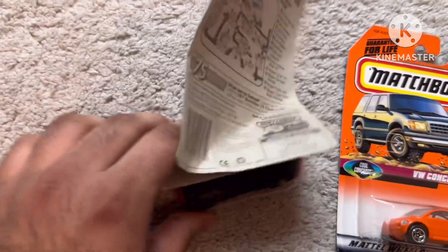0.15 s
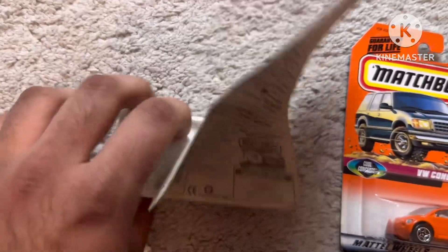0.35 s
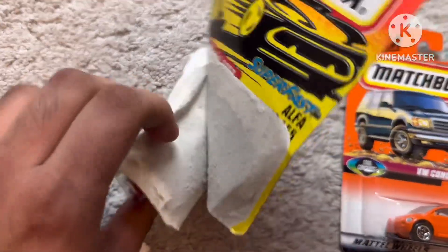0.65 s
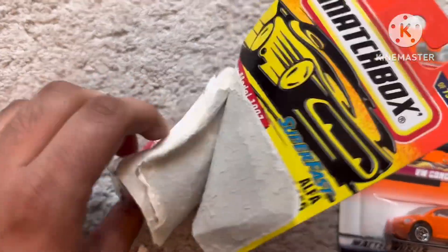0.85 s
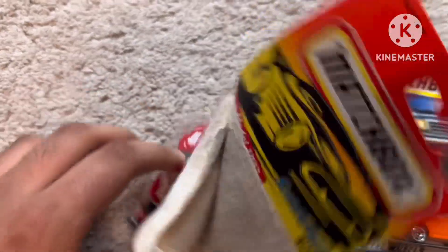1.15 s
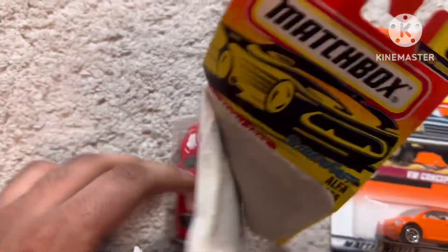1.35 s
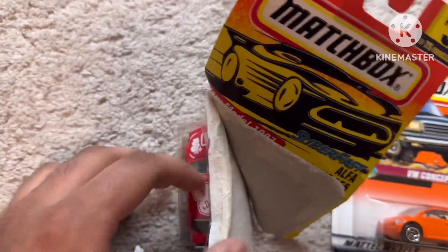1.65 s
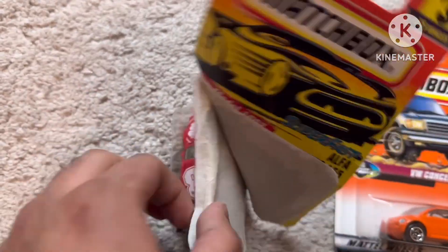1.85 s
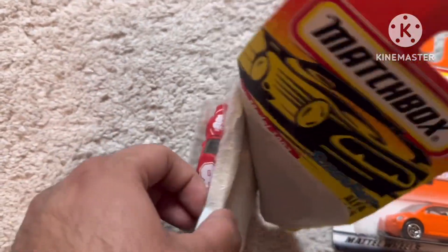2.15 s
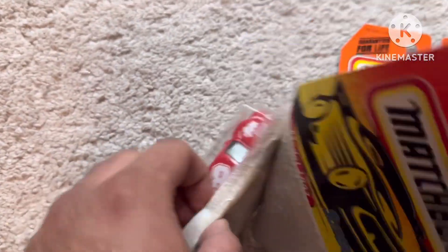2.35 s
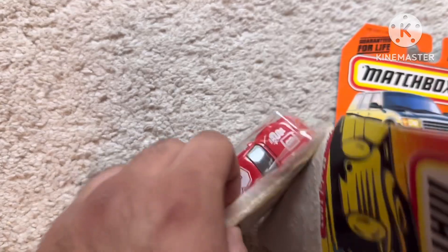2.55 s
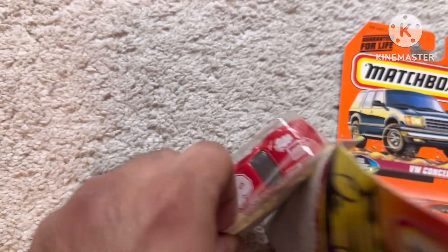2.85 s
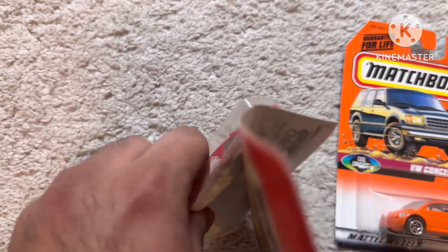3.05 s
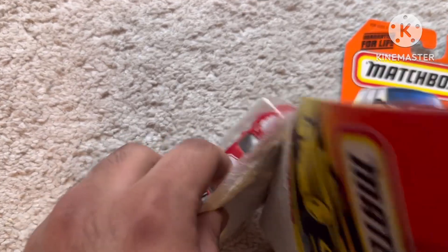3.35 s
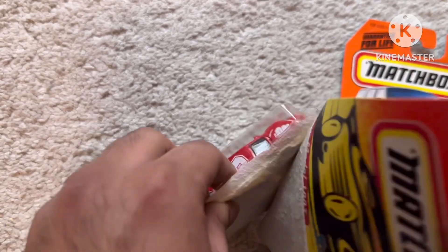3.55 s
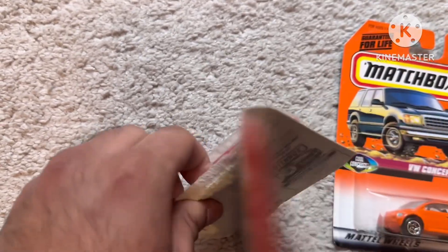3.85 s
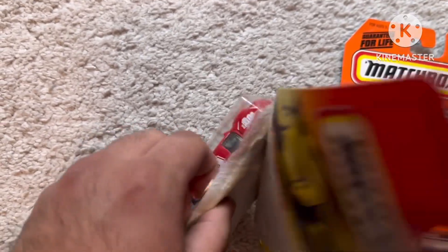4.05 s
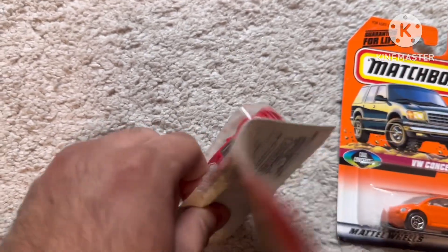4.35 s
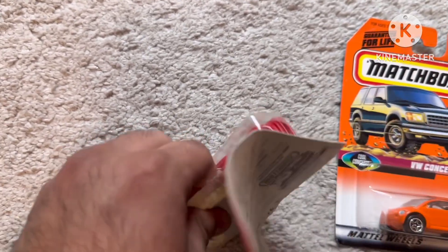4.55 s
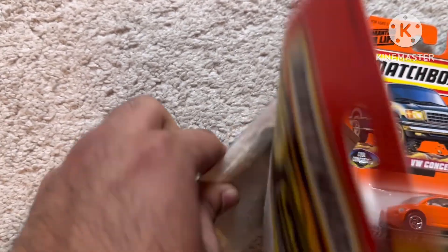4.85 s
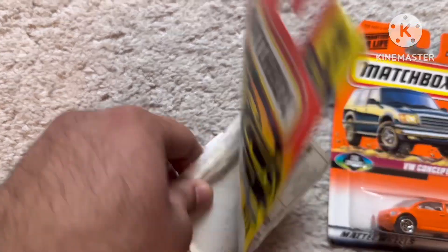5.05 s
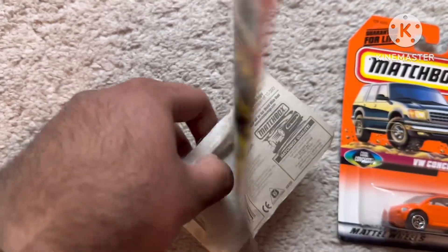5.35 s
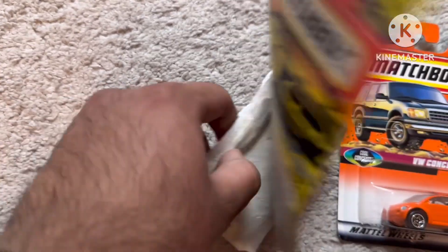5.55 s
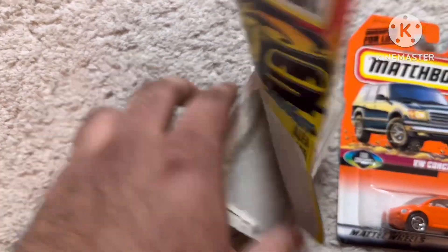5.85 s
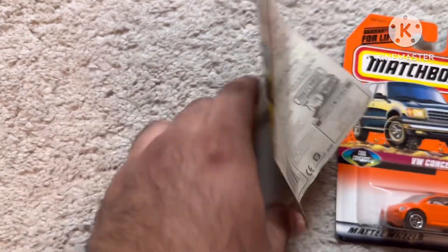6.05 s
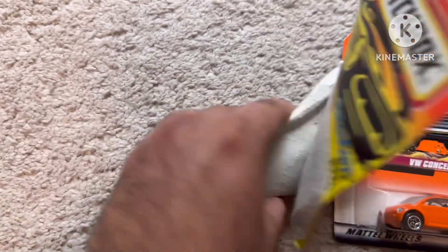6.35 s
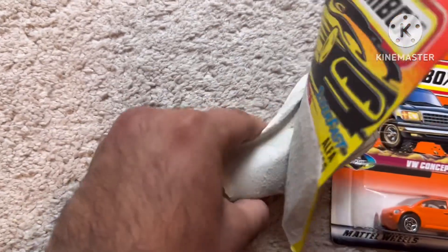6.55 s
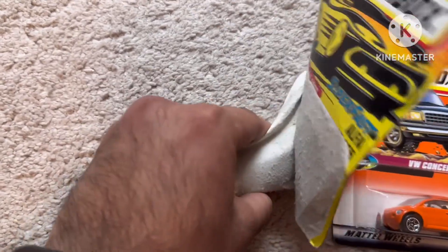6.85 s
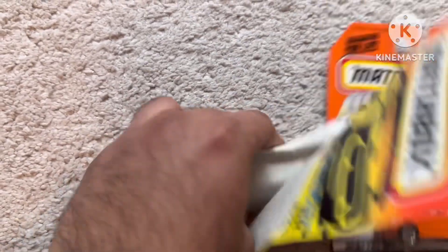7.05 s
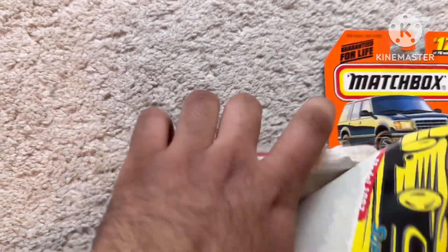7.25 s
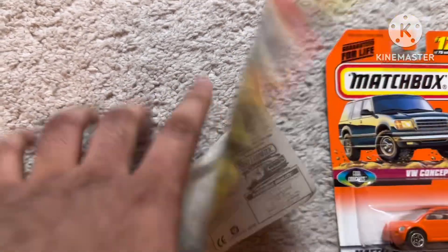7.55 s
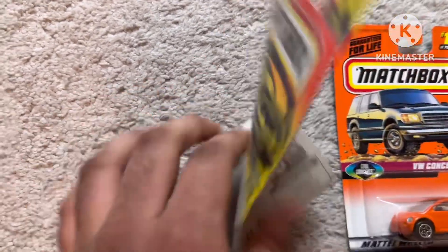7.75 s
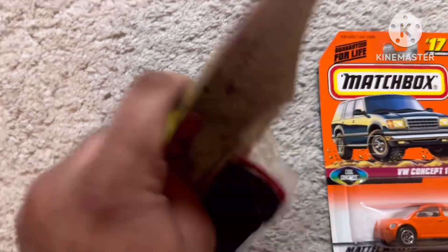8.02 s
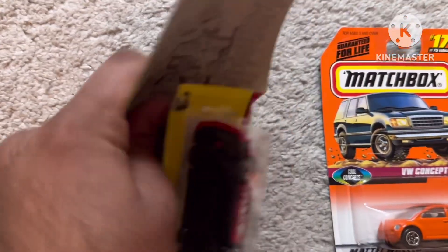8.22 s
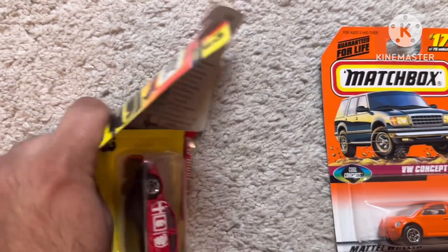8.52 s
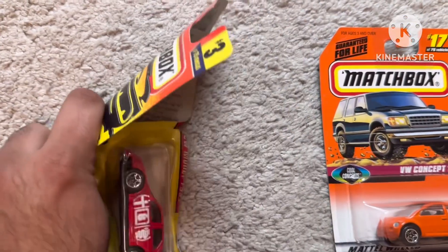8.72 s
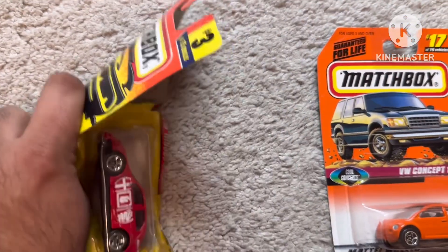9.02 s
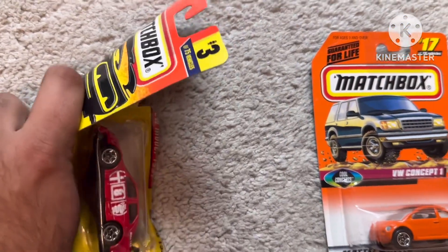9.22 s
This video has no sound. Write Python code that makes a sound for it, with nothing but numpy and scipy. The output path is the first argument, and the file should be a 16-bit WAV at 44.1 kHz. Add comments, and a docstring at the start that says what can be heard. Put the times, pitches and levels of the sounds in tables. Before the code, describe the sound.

Irregular close crackles of thin plastic and card, dry fibre ticks and rubbing hands, a bump on the microphone stand early on, quiet indoors.

```python
"""The plastic shell of a toy car's blister pack buckles in sharp snaps as hands peel off its card on a carpet.
Snaps, scuffs, breaking fibres and crinkles are blows that ring short, heavily damped modes of the pack.
Short strokes of the fingers are filtered grains and noise; a creak is a run of slips that rings the shell.
Once the card knocks the microphone's stand: a falling thump, then a low sway. A small furnished room answers
with fading noise, over quiet room air."""
import sys
import numpy as np
from scipy import signal
from scipy.fft import rfft, irfft, next_fast_len
from scipy.io import wavfile
from scipy.ndimage import map_coordinates

SR = 44100
rng = np.random.default_rng(int(sys.argv[2]) if len(sys.argv) > 2 else 0)


def persist_wave(psi):
    """Save psi, clipped to +-1, as 16-bit WAV."""
    counts = np.round(np.clip(psi, -1, 1) * 32767).astype(np.int16)
    wavfile.write(sys.argv[1], SR, np.atleast_2d(counts).T)


N = 413653
TIME = np.arange(N) / SR

# The plastic shell buckles. Each row: start in seconds, then thud, knock, crack and tick levels in dB.
SNAPS = [(0.0087, -36.5, -29.5, -35, -38), (0.044, -61.5, -40.5, -52, -60.5), (0.74, -43, -18, -20, -21.5),
         (1.2572, -30.5, -32.5, -26.5, -21), (1.431, -46.5, -45, -54, -48),
         (1.7901, -50.5, -31.5, -33.5, -40.5), (1.8217, -41.5, -39, -63, -46),
         (2.2515, -57.5, -43, -44, -46.5), (2.831, -37, -26.5, -19, -25.5), (2.9695, -64, -35.5, -42, -38),
         (3.2838, -28, -20.5, -19, -20.5), (3.4605, -42.5, -29.5, -28.5, -28),
         (3.9146, -47.5, -35.5, -21.5, -19), (4.2108, -47.5, -33, -23.5, -21.5),
         (4.293, -49.5, -40, -40.5, -38.5), (4.8291, -51, -45.5, -35, -29),
         (4.9129, -56.5, -43, -54, -39.5), (5.0894, -48, -32, -26, -31.5),
         (5.3013, -65.5, -47.5, -49.5, -53), (6.4638, -55, -38, -39.5, -63),
         (6.4715, -43.5, -26.5, -18, -29), (6.6159, -53.5, -47, -49, -45.5),
         (6.7093, -38.5, -36, -40, -37.5), (6.723, -39, -26, -27, -28), (6.8178, -48.5, -55, -45, -37),
         (6.825, -44.5, -37, -40, -48.5), (6.917, -47, -35, -40.5, -46.5), (6.9976, -51, -27.5, -37, -72),
         (7.0793, -31.5, -23, -24, -31), (7.1236, -42.5, -34, -35, -47), (7.2809, -49, -33.5, -55, -63),
         (7.315, -49, -39, -47.5, -76), (7.441, -52, -38, -53, -63), (7.479, -43.5, -38.5, -53, -73),
         (7.89, -42, -35.5, -53, -73), (7.9027, -54, -39, -58, -62), (7.923, -38.5, -32, -35, -42.5),
         (8.0156, -42, -36, -40, -52), (8.3441, -27.5, -23, -18, -28.5), (8.4677, -40, -31, -31.5, -33),
         (8.6017, -63, -37.5, -48, -40.5), (9.0043, -38, -27, -45, -61), (9.0276, -65.5, -47, -46, -35.5)]
# The hand shifts its hold and drags the card over the plastic. Each row: start in seconds, length in seconds,
# then the levels of hand on carpet, card and plastic hiss in dB.
STROKES = [(0.0, 0.025, -39.5, -41, -55), (0.119, 0.12, -66.5, -54.5, -62),
           (0.275, 0.089, -52, -56.5, -65.5), (0.572, 0.38, -67, -53.5, -60.5),
           (0.83, .05, -63.5, -55.5, -67.5), (1.128, 0.073, -54.5, -51.5, -49),
           (1.259, .045, -39.5, -43, -41), (1.333, .12, -54, -56, -52.5), (1.807, 0.045, -61, -49, -53),
           (1.943, 0.036, -60.5, -50.5, -58.5), (2.161, .04, -67.5, -54.5, -59.5),
           (2.223, 0.02, -62.5, -48, -49.5), (2.341, 0.018, -57, -52.5, -57.5),
           (2.43, 0.037, -72, -58, -57.5), (2.602, 0.01, -64.5, -59, -52.5), (2.84, 0.018, -39, -40.5, -41),
           (2.972, 0.045, -47.5, -52.5, -71.5), (3.223, 0.16, -59.5, -63, -63),
           (3.357, .08, -63, -61.5, -64.5), (3.612, 0.056, -61.5, -61.5, -54), (3.918, .04, -58, -45, -42),
           (3.977, 0.15, -61, -56, -51.5), (4.374, .06, -68.5, -68, -50.5),
           (4.803, 0.054, -58.5, -53, -50.5), (4.88, 0.034, -56, -55, -57.5),
           (5.305, 0.018, -73, -49, -55.5), (5.374, 0.15, -90.5, -65, -64.5), (5.552, .13, -76.5, -54, -62),
           (5.824, 0.057, -57.5, -51, -67.5), (5.921, .05, -61.5, -56.5, -67),
           (6.333, 0.16, -67, -60.5, -67), (6.517, .08, -78.5, -50.5, -51), (6.629, 0.021, -95, -48.5, -62),
           (6.799, 0.0067, -63, -47.5, -48.5), (6.92, 0.2, -59, -60.5, -58.5),
           (7.204, 0.02, -45, -43.5, -53), (7.269, 0.044, -51.5, -51, -57), (7.462, .055, -63, -49.5, -56),
           (7.525, .04, -47.5, -57, -77.5), (7.612, 0.045, -58, -56, -63),
           (7.777, 0.062, -53.5, -48.5, -56), (7.886, 0.069, -56, -43.5, -48.5),
           (8.013, .06, -49.5, -44.5, -43.5), (8.329, 0.047, -46, -50.5, -47.5),
           (8.427, 0.086, -53.5, -51.5, -49.5), (8.547, .07, -51.5, -51, -45.5),
           (8.649, .1, -65.5, -53.5, -51.5), (8.844, 0.16, -60.5, -51, -53.5),
           (8.986, 0.074, -60, -50, -49.5), (9.094, 0.039, -63.5, -48, -48), (9.219, .03, -67.5, -74, -64)]


def from_db(db):
    """Turn decibels into a loudness factor."""
    return np.exp(np.asarray(db) * (np.log(10) / 20))


def rms_one(x):
    """Scale a signal to an average strength (rms) of 1."""
    return x / np.sqrt(np.mean(x ** 2) + 1e-20)


def at_hz(points, hz, column=1):
    """Read a table between its rows, with pitch on a log scale as we hear it."""
    points = np.array(points)
    return np.interp(np.log(np.maximum(hz, 1)), np.log(points[:, 0]), points[:, column])


def in_time(rows):
    """Read the columns of a curve at every sample."""
    seconds, *columns = np.transpose(rows)
    return [np.interp(TIME, seconds, column) for column in columns]


def during(rows):
    """True while a curve lasts."""
    return (TIME >= rows[0][0]) & (TIME <= rows[-1][0])


def drift(rate):
    """Wander slowly at random with spread 1, heading for a new value `rate` times a second."""
    knots = rng.standard_normal(4000)
    return rms_one(np.interp(TIME * rate, np.arange(len(knots)), knots))


def left_right(pan_db):
    """Give the factors that make the left side louder than the right by this many dB."""
    return from_db([[pan_db / 2], [-pan_db / 2]])


def add(out, start, sound):
    """Mix a stereo sound in at a start time in seconds."""
    at = max(round(start * SR), 0)
    out[:, at:at + sound.shape[1]] += sound[:, :N - at]


def coloured(mid, side, spectrum):
    """Filter two unrelated signals into one stereo sound whose sides are more alike at some pitches; rms 1."""
    # Each row: frequency in Hz, likeness of the two sides from 0 to 1.
    likeness = [(60, 0.91), (300, 0.75), (700, 0.75), (1400, 0.32), (3000, 0.4), (7000, 0.5), (15000, 0.6)]
    size = next_fast_len(N)
    hz = np.arange(size // 2 + 1) * SR / size
    alike = np.clip(at_hz(likeness, hz), 0, 1)
    mid = np.sqrt(1 + alike) * rfft(mid, size)
    side = np.sqrt(1 - alike) * rfft(side, size)
    sides = np.array([mid + side, mid - side])
    return rms_one(irfft(sides * from_db(at_hz(spectrum, hz)), size)[:, :N])


def snaps():
    """Each buckle of the shell is one sudden release: a single blow rings the pack."""
    out = np.zeros((2, N))
    for start, *levels_db in SNAPS:
        add(out, start, pack_ring(np.ones(1), levels_db))
    return out


def pack_ring(force, levels_db, count=22, size=2400):
    """A force rings the pack's heavily damped modes, which shift each time it bends into a new shape."""
    # The four registers: thud, knock, crack, tick. Each row: low Hz, high Hz, time to fall 60 dB in seconds,
    # build-up in seconds, slope in dB per octave, left over right in dB, phase spread between sides in radians.
    registers = [(179.4, 561, 0.032, 0.0041, 1, 4, 0.17), (611.3, 1447, 0.033, 0.00089, -2, 1, 1),
                 (1510, 3447, 0.012, 0.00032, -6.5, 2, 1), (3440, 17300, 0.0073, 0.0009, -10, 1.5, 0.68)]
    event_s = 0.01   # each level is the event's energy spread over this time
    t = np.arange(size) / SR
    out = 0
    for (low, high, t60, build, slope_db, pan_db, spread), level_db in zip(registers, levels_db):
        place = (np.arange(count) + rng.random(count)) / count
        hz = low * (high / low) ** place[:, None]
        strength, life, phase, skew = rng.standard_normal((4, count, 1))
        # each mode takes its own share of the blow, swells quickly and dies
        gain = (1 + 0.5 * strength) * from_db(slope_db * np.log2(hz / low)) * np.sqrt(hz / low)
        fall = from_db(-60 * t / (t60 * np.exp(0.1 * life)))
        envelope = gain * fall * (1 - np.exp(-t / build))
        swing = 2 * np.pi * hz * t + 1.84 * phase
        left = (envelope * np.sin(swing)).sum(axis=0)
        right = (envelope * np.sin(swing - 0.15 - spread * skew)).sum(axis=0)
        band_hz = [low * 0.84, min(high * 3.2, SR * 0.45)]
        band = signal.butter(2, band_hz, "band", fs=SR, output="sos")
        sides = signal.fftconvolve(np.array([left, right]), force[None], axes=1)
        sides = signal.sosfilt(band, sides) * left_right(pan_db)
        energy = np.mean(np.sum(sides ** 2, axis=1))
        out = out + from_db(level_db) * sides * np.sqrt(event_s * SR / energy)
    return out


def scuffs(slips_per_s=1500, uneven_db=3.5, fade_db=6.0):
    """The card scuffs or rips: a fading run of tiny uneven slips rings the pack."""
    # Each row: start in seconds, length in seconds, then thud, knock, crack and tick levels in dB.
    bursts = [(0.014, 0.011, -55.5, -36.5, -45, -41.5), (0.718, 0.046, -45, -38, -39, -34.5),
              (0.756, 0.042, -53, -34.5, -37, -46), (0.845, 0.016, -47, -43, -65, -52),
              (1.442, 0.017, -41, -44, -48.5, -45.5), (1.571, 0.027, -38, -31, -35.5, -31),
              (2.229, 0.025, -43.5, -51, -48, -46), (2.9716, 0.004, -26.5, -28, -34, -40.5),
              (2.979, 0.02, -67, -41, -51, -45), (4.087, 0.014, -38, -36, -38, -34),
              (4.273, 0.018, -49, -43, -39.5, -44), (4.696, 0.017, -51.5, -36, -35, -37.5),
              (4.843, 0.0076, -59, -41, -42, -46), (5.127, 0.012, -44.5, -29, -39.5, -36),
              (5.143, 0.018, -47, -60, -52, -47.5), (5.312, 0.0056, -52.5, -41, -45, -51.5),
              (5.815, 0.012, -63, -38.5, -39.5, -48), (5.83, 0.021, -57, -46, -45, -50),
              (7.052, 0.0094, -33, -29.5, -35.5, -43), (7.278, 0.025, -61, -38.5, -42.5, -53),
              (7.46, 0.017, -54, -45, -47, -55), (7.611, 0.034, -48, -56, -48, -60),
              (7.776, 0.03, -49, -42, -49, -57), (8.36, 0.019, -37, -32, -49, -47),
              (8.481, 0.009, -46, -57, -58, -60)]
    out = np.zeros((2, N))
    for start, length, *levels_db in bursts:
        chance = rng.random(SR // 10)
        size, sign = rng.standard_normal((2, SR // 10))
        progress = np.arange(SR // 10) / (length * SR)
        slips = (chance < slips_per_s / SR) * np.sign(sign)
        force = slips * from_db(uneven_db * size - fade_db * progress)
        force[0] = 2   # the first slip is firm
        add(out, start, pack_ring(force[progress < 1], levels_db))
    return out


def fibres():
    """A fibre of the card lets go with a small dry tick: one tap on the pack."""
    # Each row: start in seconds, level in dB, brightness in dB.
    breaks = [(0.2783, -45.5, -12), (0.2922, -51, -16), (0.3146, -48, -9), (0.3414, -52, -10),
              (0.362, -52, -5), (0.4835, -41.5, -3), (0.502, -50, 2.5), (0.518, -45, -17),
              (0.5538, -43.5, -4.5), (.566, -44, 3.5), (0.582, -54.5, 4), (0.606, -44, -10),
              (0.6167, -42, -0.5), (0.6376, -46, -1.5), (0.6497, -45.5, -4), (0.669, -48, 0.5),
              (.683, -50.5, 7), (.6973, -52.5, 1), (1.1278, -50.5, 1.5), (1.73, -48.5, -6), (2.197, -52, 0),
              (2.369, -61, -18), (2.55, -45.5, -3), (3.6024, -53, 7.5), (3.803, -59.5, 1), (4.537, -69, 15),
              (5.511, -40, -15.5), (5.6262, -49, -12), (5.6644, -42, -5.5), (6.1718, -39, -15.5),
              (6.235, -53.5, -2), (6.3, -48.5, -16.5), (6.32, -47, -19.5), (6.369, -44.5, -23.5),
              (8.311, -52.5, -10), (8.9428, -43.5, 2)]
    # For thud, knock, crack and tick: offset in dB, and the share of the brightness that each takes.
    offsets_db, bright_share = np.array((-11, -1, -4.5, -1)), np.array((0.48, 0.063, 0.12, 1))
    out = np.zeros((2, N))
    for start, level_db, bright_db in breaks:
        levels_db = level_db + offsets_db + bright_db * bright_share
        add(out, start, pack_ring(np.ones(1), levels_db, count=12, size=1300))
    return out


def crinkles(hand_db, card_db, hiss_db, uneven_db=0.5, above_rub_db=-5.5, count=2):
    """During each stroke a few stray creases give way as small blows, louder under a firmer stroke."""
    out = np.zeros((2, N))
    rub_db = np.array([hand_db - 5.5, card_db - 1.5, flexing(card_db, hiss_db), hiss_db - 9.0])
    for start, length, *_ in STROKES:
        for k, (when, size) in enumerate(rng.random((count, 2))):
            at = int(np.clip((start + length * (k + when) / count) * SR, 0, N - 1))
            levels_db = rub_db[:, at] + above_rub_db + 2 * uneven_db * size
            add(out, at / SR, pack_ring(np.ones(1), levels_db, count=7, size=1000))
    return out


def rubbing(hand_db, card_db, hiss_db):
    """The hand shifts on the carpet, fingers rub the card, the card flexes and slides on the plastic."""
    # Colours of the hand on the carpet, the rubbed card, its flexing and the plastic's hiss.
    # Each row: frequency in Hz, relative strength in dB per Hz.
    carpet_colour, card_colour = [(25, -7), (60, 8), (110, 9), (180, 2.5), (300, 5), (420, 1), (600, -32),
                                  (1200, -44)], [(250, -22), (450, -5.5), (560, -0.5), (820, 5),
                                                  (1030, -.5), (1280, 6), (1550, -7), (2100, -19.5),
                                                  (5000, -35.5)]
    flex_colour, hiss_colour = [(1200, -17), (1600, -3.5), (2000, 3), (2400, -4), (2900, -4.5), (3600, -15),
                                (6000, -24.5), (12000, -51.5)], [(1800, -10), (3000, 1.5), (4400, 7), (5500, 2.5), (7400, 1.5),
                                              (8500, 5.5), (10000, 0), (13000, -9), (16000, -7.5)]
    flex_db = flexing(card_db, hiss_db)
    hand = friction(hand_db, carpet_colour, grains_per_s=300, grain_db=-1.0, smooth=1.0,
                    flutter_db=-1.0, pan_db=-0.4)
    card = friction(card_db, card_colour, grains_per_s=300, grain_db=4.5, smooth=0.68,
                    flutter_db=0.5, pan_db=2.0)
    flex = friction(flex_db, flex_colour, grains_per_s=470, grain_db=2.5, smooth=0.94,
                    flutter_db=4.0, pan_db=0.5)
    hiss = friction(hiss_db, hiss_colour, grains_per_s=1100, grain_db=2.5, smooth=0.78,
                    flutter_db=2.6, pan_db=0.6)
    return hand + bending(card + flex, patchy_db=5.0, per_s=13.0) + bending(hiss, patchy_db=3.5, per_s=9.7)


def friction(level_db, spectrum, grains_per_s, grain_db, smooth, flutter_db, pan_db):
    """Fibres catch in tiny grains of uneven size, more of them under a firmer stroke, over a smooth rush."""
    rate = grains_per_s * from_db(0.5 * (level_db - level_db.mean()))
    sizes = from_db(grain_db * np.minimum(rng.exponential(1, (2, N)), 4))
    sizes = sizes * rng.choice([-1, 1], (2, N))
    catches = rng.random((2, N)) < rate / SR
    grains = rms_one(sizes * catches / np.sqrt(rate))
    force = grains + smooth * rng.standard_normal((2, N))
    loudness = from_db(level_db + flutter_db * drift(90))
    return coloured(*force, spectrum) * loudness * left_right(pan_db)


def flexing(card_db, hiss_db):
    """The card flexes with both the rubbing and the sliding: a weighted mean of their levels, moved by an offset."""
    follows_hiss, offset_db = 0.3, -3.5
    return card_db + follows_hiss * (hiss_db - card_db) + offset_db


def bending(x, patchy_db, per_s, count=40):
    """As the card bends, its resonances come and go: random patches of gain over pitch and time."""
    hz, t, cells = signal.stft(x, SR, nperseg=512)
    pitch = count * np.log(np.maximum(hz, 100) / 100) / np.log(hz[-1] / 100)
    patches = rng.standard_normal((count + 2, 400))
    where = np.meshgrid(pitch, t * per_s, indexing="ij")
    gain_db = patchy_db * map_coordinates(patches, where, order=1)
    # keep the average power gain at 1
    gain = from_db(gain_db) / np.sqrt(np.mean(from_db(2 * gain_db)))
    return signal.istft(cells * gain, SR)[1][:, :N]


def handling(step_size=40):
    """Add up the power of grip, strokes and slides after snaps: hand, card and hiss in dB at every sample."""
    # The holding hand's faint rubbing. Each row: time in seconds, level in dB.
    grip = [(0, -62.5), (1.5, -59.5), (2.4, -64), (3.4, -59), (5.2, -67), (6.0, -63), (7.0, -63),
            (8.6, -63), (9.38, -61)]
    # Relative to that, in dB: hand on carpet, card, plastic hiss.
    grip_offsets_db = np.array((-7.0, 0, -2.5))
    # The hand pauses and eases its grip. Each row: start in seconds, length in seconds.
    rests = [(0.979, .11), (1.648, 0.043), (2.02, 0.086), (2.65, 0.13), (3.103, .06), (3.731, 0.13),
             (4.477, 0.11), (4.966, 0.028), (5.741, 0.083), (7.355, 0.043), (7.701, 0.077), (8.143, 0.18),
             (9.277, 0.076)]
    # The freed card slides to rest after a snap: hand, card and hiss in dB relative to its thud, knock and tick.
    settle_offsets_db = (-10, -13.5, -19.5)
    rest_db = -6
    # times in seconds to rise or fall by 20 dB
    attack_s, release_s, settle_s = 0.022, 0.044, 0.046
    rest_fade_s = 0.046   # the rest's depth shrinks tenfold in this time at either end

    t = TIME[::step_size]
    resting = sum(from_db(swell_db(t, start, length, rest_fade_s, rest_fade_s)) for start, length in rests)
    grip_db = np.interp(t, *np.transpose(grip)) + rest_db * resting
    power = from_db(grip_db + grip_offsets_db[:, None]) ** 2
    for start, length, *levels_db in STROKES:
        swell = swell_db(t, start, length, attack_s, release_s)
        power = power + from_db(np.array(levels_db)[:, None] + swell) ** 2
    for start, thud_db, knock_db, _, tick_db in SNAPS:
        levels_db = np.add([thud_db, knock_db, tick_db], settle_offsets_db)
        swell = swell_db(t, start, 0, settle_s, settle_s)
        power = power + from_db(levels_db[:, None] + swell) ** 2 * (t > start)
    return np.array([np.interp(TIME, t, 10 * np.log10(p)) for p in power])


def swell_db(t, start, length, attack_s, release_s):
    """Rise, hold and fall along straight lines in dB; each time given is for 20 dB."""
    before = (start - t) / attack_s
    after = (t - start - length) / release_s
    return -20 * np.clip(np.maximum(before, after), 0, 10)


def creak(jitter=0.12, t60=0.012, size=1500):
    """The card sticks and slips on the plastic: slips ring the taut shell at a buzzing rate that slows at the end."""
    # Each row: time in seconds, slips per second, level in dB.
    slipping = [(6.49, 200, -52), (6.525, 300, -42), (6.545, 285, -31), (6.56, 210, -36),
                (6.583, 96, -40.5)]
    # Modes of the taut shell. Each row: frequency in Hz, relative level in dB.
    shell = [(1960, 14), (2520, 15), (2950, 8.5), (3600, -17), (4250, 11), (4650, 13), (5300, -30),
             (6780, 2), (8390, 4.5), (9100, 8)]
    rate, level_db = in_time(slipping)
    uneven_rate = rate * (1 + jitter * drift(200)) * during(slipping)
    turns = np.floor(np.cumsum(uneven_rate) / SR)
    # one slip at each whole turn
    slips = np.diff(turns, prepend=0) * from_db(level_db) * np.sqrt(SR / rate)
    t = np.arange(size) / SR
    modes = sum(from_db(db) * np.cos(2 * np.pi * hz * t + rng.uniform(-1.2, 1)) for hz, db in shell)
    ring = modes * from_db(-60 * t / t60)
    return signal.oaconvolve(slips, ring / np.linalg.norm(ring))[:N]


def stand():
    """A knock travels up the stand as a thump of falling pitch and leaves it swaying at one low pitch."""
    # The knock. Each row: time in seconds, frequency in Hz, level in dB.
    bump = [(1.258, 190, -60), (1.267, 110, -22), (1.275, 66, -7.5), (1.283, 56, -13.5), (1.294, 50, -29),
            (1.315, 47, -30)]
    # The stand sways on. Each row: time in seconds, level in dB.
    sway = [(1.3, -50), (1.36, -28), (1.41, -31.5), (1.46, -44), (1.505, -32), (1.58, -40), (1.64, -42),
            (1.71, -74)]
    sway_hz = 47.3
    hz, bump_db = in_time(bump)
    sway_db, = in_time(sway)
    phase = 2 * np.pi * np.cumsum(hz * during(bump)) / SR
    thump = from_db(bump_db) * during(bump) * np.sin(phase)
    swaying = np.sin(2 * np.pi * sway_hz * (TIME - sway[0][0]))
    return thump + from_db(sway_db) * during(sway) * swaying


def room(x, count=14):
    """The pack keeps turning, so the room's answer fades from one pattern of echoes to the next."""
    out = np.zeros((2, N))
    hop = N // count + 1
    for centre in range(0, N + hop, hop):
        span = np.arange(max(centre - hop, 0), min(centre + hop, N))
        piece = x[:, span] * np.cos(np.pi / 2 * (span - centre) / hop)
        response = room_response(ceiling_s=0.016, ceiling_gain=0.97)
        add(out, span[0] / SR, signal.fftconvolve(piece, response, axes=1))
    return out


def room_response(ceiling_s, ceiling_gain, onset_s=0.0015, count=12):
    """A cluster of ceiling echoes stands on a diffuse noise tail that dies band by band."""
    # Each row: frequency in Hz, time to fall 60 dB in seconds, level in dB.
    tail = [(200, 0.2, -8.5), (610, 0.28, -15.5), (1500, 0.23, -10.5), (4270, 0.35, -14),
            (9000, 0.29, -14.5), (16000, .17, -33.5)]
    t = np.arange(SR // 3) / SR
    edges = np.geomspace(100, 17000, count + 1)
    onset = 1 - np.exp(-(t / onset_s) ** 2)
    ceiling = ceiling_gain * np.exp(-((t - ceiling_s) / 0.0029) ** 2)
    response = 0
    for low, high in zip(edges, edges[1:]):
        hz = np.sqrt(low * high)
        band = signal.butter(2, [low, high], "band", fs=SR, output="sos")
        noise = signal.sosfilt(band, rng.standard_normal((2, len(t))))
        shape = onset * (1 + ceiling) * from_db(-60 * t / at_hz(tail, hz, column=1))
        # long waves reach both microphones alike
        shared = 1 / (1 + (hz / 900) ** 2)
        noise = np.sqrt(1 + shared) * noise[0] + np.sqrt(1 - shared) * noise[1] * [[1], [-1]]
        shape = shape / np.sqrt(2 * np.sum(shape ** 2))
        response = response + noise * shape * from_db(at_hz(tail, hz, column=2))
    return response


def air(level_db=-69.5):
    """Quiet room air is steady noise with a colour of its own."""
    # Each row: frequency in Hz, relative strength in dB per Hz.
    air_colour = [(25, 2.5), (70, 19), (300, 12), (1200, -1.5), (4000, 4), (9000, -39), (16000, -34.5)]
    return from_db(level_db) * coloured(*rng.standard_normal((2, N)), air_colour)


def scene(right_lag_s=1.5e-5, pan_db=0.5):
    """Set the pack in its room, with the stand and the air."""
    rub_db = handling()
    left, right = snaps() + scuffs() + fibres() + crinkles(*rub_db) + creak() + rubbing(*rub_db)
    # the pack lies a little to the left: its sound reaches the right microphone later and softer
    size = next_fast_len(N)
    hz = np.arange(size // 2 + 1) * SR / size
    lag = np.exp(-2j * np.pi * hz * right_lag_s)
    late_right = irfft(rfft(right, size) * lag, size)[:N]
    pack = np.array([left, late_right]) * left_right(pan_db)
    return pack + room(pack) + stand() + air()


def record(dry, port_hz=8350, port_gain=0.68, port_q=19.4, weak_hz=(10100, 12600), cutoff_hz=16150):
    """The microphone port rings; a band near 11 kHz is weak; peaks are rounded, the top is cut."""
    ringing = port_gain * signal.lfilter(*signal.iirpeak(port_hz, port_q, fs=SR), dry)
    x = np.tanh(dry + ringing)
    x = signal.sosfilt(signal.butter(3, weak_hz, "bandstop", fs=SR, output="sos"), x)
    return signal.sosfilt(signal.ellip(10, 0.3, 80, cutoff_hz, fs=SR, output="sos"), x)


dry = scene()
out = record(dry)
persist_wave(out)
```